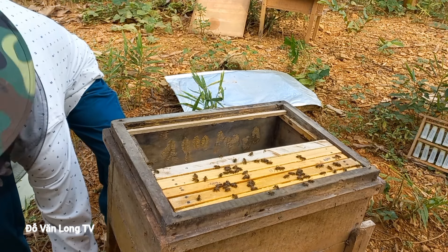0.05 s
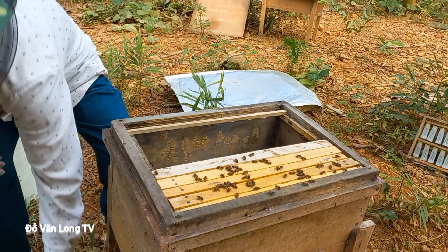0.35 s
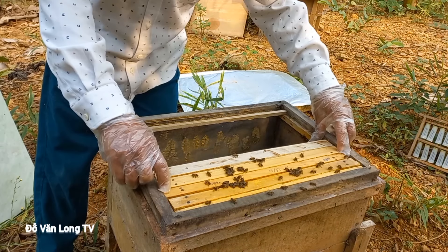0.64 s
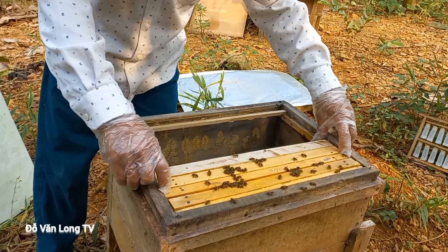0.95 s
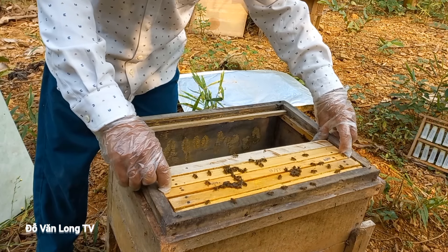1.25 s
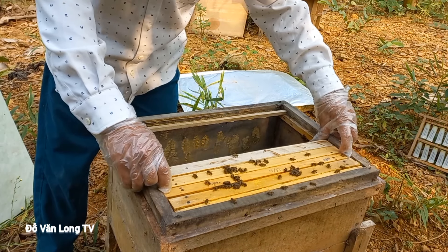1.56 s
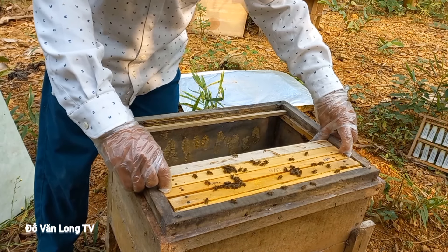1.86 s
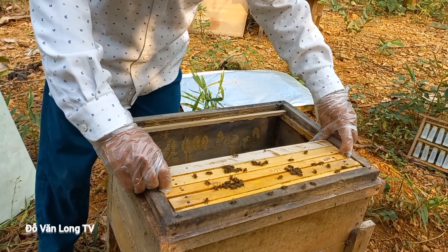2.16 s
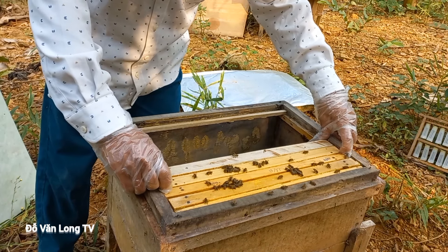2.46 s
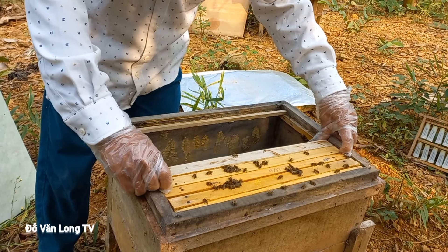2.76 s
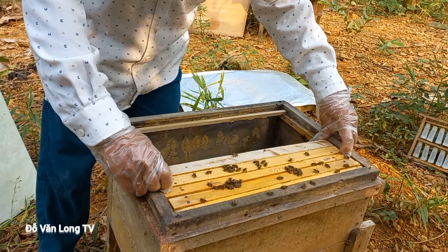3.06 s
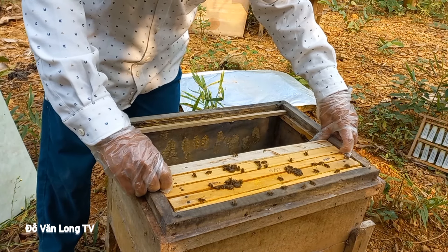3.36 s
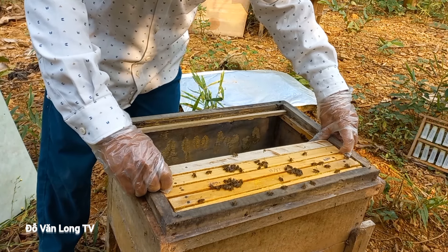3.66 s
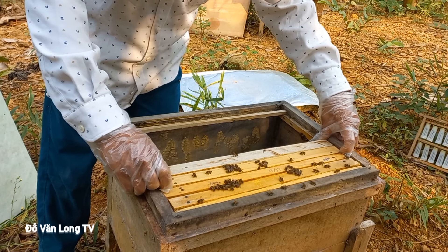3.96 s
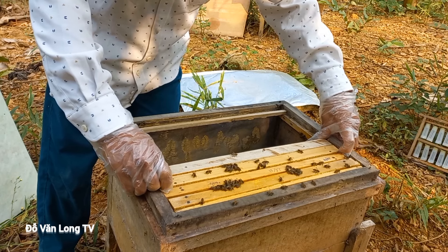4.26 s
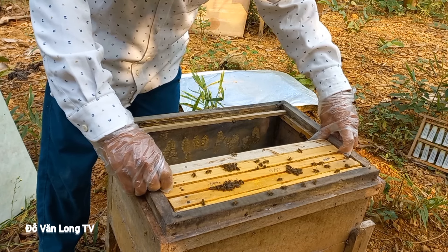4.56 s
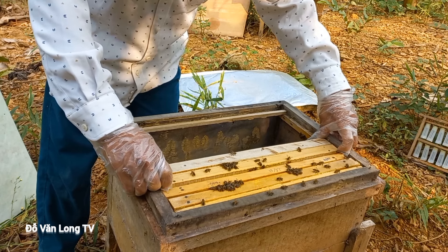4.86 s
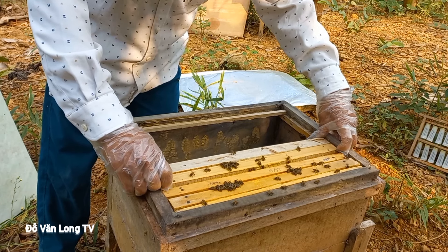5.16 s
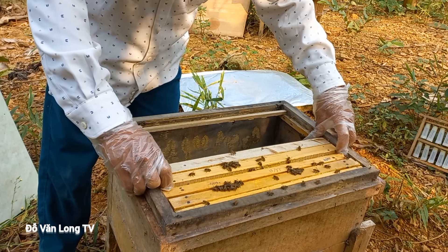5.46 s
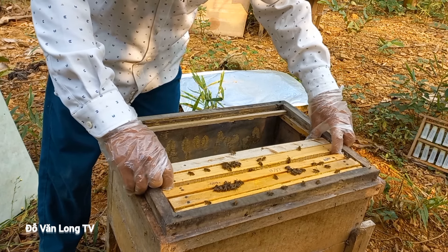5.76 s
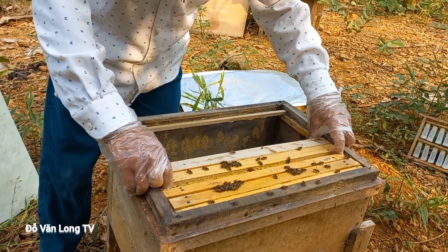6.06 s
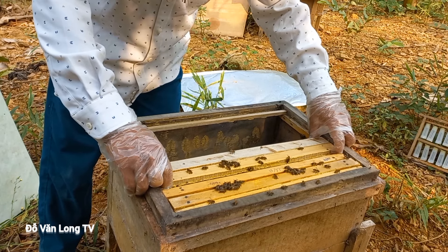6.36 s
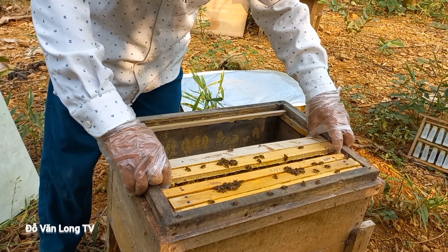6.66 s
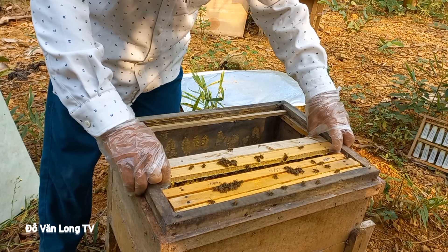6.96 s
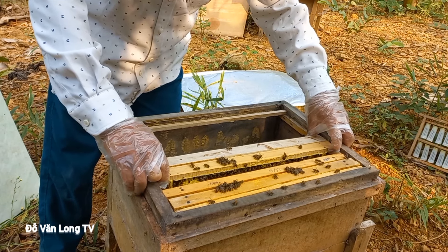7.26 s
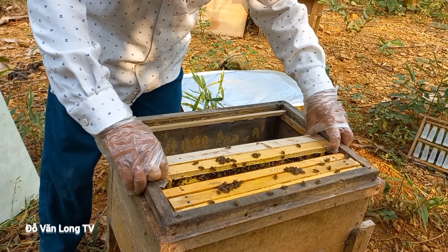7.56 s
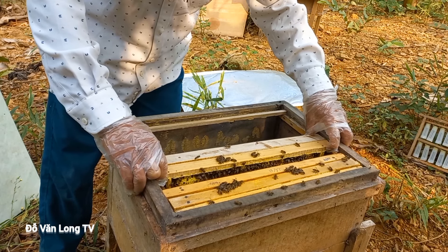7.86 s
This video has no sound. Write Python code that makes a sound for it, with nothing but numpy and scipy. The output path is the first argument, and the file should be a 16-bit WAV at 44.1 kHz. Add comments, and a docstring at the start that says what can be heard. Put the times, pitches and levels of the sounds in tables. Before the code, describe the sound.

Birds chirp and plastic gloves rustle and snap at an open beehive, with a far engine thudding and slowly fading.

```python
"""Lifting a frame from a beehive

A beekeeper eases a frame out of an open wooden hive in a garden. Creases buckle in thin plastic gloves,
the frames tick and scrape, and the box rings once at the outset. Small birds chirp in the trees and the
colony's wingbeats make a faint buzz. From half a second on, a train of low thuds, like a far
single-cylinder engine, throbs under it all and slowly runs down."""
import sys
import numpy as np
from scipy import signal
from scipy.fft import rfft, irfft, next_fast_len
from scipy.io import wavfile
from scipy.ndimage import uniform_filter1d

SR = 44100
rng = np.random.default_rng(int(sys.argv[2]) if len(sys.argv) > 2 else 0)


def log_audio(samples):
    """Write samples as a 16-bit WAV file to the path given in sys.argv[1]."""
    # one column per channel
    frames = np.atleast_2d(samples).T
    # limit to full scale, then quantise
    limited = np.clip(frames, -1, 1)
    pcm = np.round(limited * 32767).astype(np.int16)
    wavfile.write(sys.argv[1], SR, pcm)


N = 358091
T = np.arange(N) / SR

# Crinkle as the hands reach, grip and pull. Each row: time in seconds, relative level in dB.
HAND_EFFORT = [(0.0, -56), (0.48, -63.5), (0.6, -55.5), (1.08, -56), (1.36, -45.5), (1.62, -53),
               (2.42, -60), (3.66, -62), (3.98, -58), (4.45, -62.5), (4.85, -61), (5.1, -70.5),
               (5.24, -58.5), (5.36, -51.5), (5.72, -50), (5.88, -44.5), (6.2, -70.5), (6.6, -58),
               (6.75, -65), (7.53, -64.5), (7.9, -66), (8.05, -68.5)]
# Quick shifts of the fingers. Each row: start in seconds, length in seconds, relative level in dB.
FINGER_RUSTLES = [(0.033, 0.13, -60), (0.248, 0.19, -57.5), (1.538, 0.2, -48.5), (1.983, 0.42, -62),
                  (2.803, 0.052, -70), (2.922, 0.1, -52.5), (3.73, 0.19, -54), (4.135, 0.1, -47.5),
                  (4.753, 0.12, -53.5), (5.77, 0.25, -50.5), (6.109, 0.13, -52.5), (6.314, 0.073, -57),
                  (6.484, 0.15, -58)]
# Spectrum of the glove crinkle as coloured by the microphone. Each row: frequency in Hz, gain in dB.
CRINKLE_SPECTRUM = [(300, -36), (900, -19), (1550, -7.5), (2500, -13), (4000, -6.5), (5700, -7),
                    (6900, 0.5), (8300, -7), (10000, -2), (12000, 2.5), (13600, 5), (16000, -5)]
# Snaps of film and frame. Each row: start in seconds, relative peak in dB, left minus right in dB.
SNAP_EVENTS = [(0.0344, -31, 5), (0.541, -48, -2), (0.6689, -32.5, -1), (0.812, -30.5, 11),
               (1.0899, -33, 3), (1.8464, -30.5, 5), (1.9002, -24.5, 1), (1.9505, -26, -4),
               (2.0862, -34, 1), (2.1425, -36, -5), (2.2313, -32, -2.5), (2.6122, -37.5, -1.5),
               (2.9492, -26.5, 0), (3.0255, -36, 1), (3.1692, -40, -4), (3.273, -31.5, 7), (3.3824, -34, 2),
               (3.715, -34.5, 0), (3.7638, -33, -1), (3.843, -32.5, 2), (3.912, -28, 6), (4.1596, -29, -2),
               (4.2078, -28, -1), (4.3021, -34.5, 4), (5.3907, -26, 0), (5.724, -32, 3),
               (5.8277, -29.5, -0.5), (5.8638, -24, 4), (5.8835, -23.5, 2), (6.0327, -25, 4),
               (6.0536, -33, 2), (6.1544, -30, 3), (6.1774, -33, -0.5), (6.2118, -35.5, 1),
               (6.353, -37.5, 0), (6.4715, -34, 12), (6.8313, -37, -6), (7.1392, -35, 3), (7.1838, -37, 15),
               (7.2594, -32, -1), (7.3607, -37.5, 4), (7.6495, -39, 1.5), (7.666, -38, 1),
               (7.7476, -33, -2), (7.7643, -35.5, 3), (7.8608, -39, 0)]
# Spectrum of a snap. Each row: frequency in Hz, gain in dB.
SNAP_SPECTRUM = [(500, -35), (2500, -44), (5000, -14.5), (7000, 1.5), (9000, -9), (13000, 1.5),
                 (16000, -10)]
# Modes of the hive box. Each row: frequency in Hz, level in dB, time to fall 60 dB in seconds.
BOX_MODES = [(168.7, -61, 0.68), (320, -50, .17), (353, -41, 0.13), (406, -48, 0.1), (533, -51, 0.16),
             (670, -44.5, 0.04)]
# Spectrum of the box's loose parts. Each row: frequency in Hz, gain in dB.
RATTLE_SPECTRUM = [(60, -12), (330, 2), (800, -9), (1400, -17), (2200, -20), (6000, -23)]
# Bird notes that dip, then whip upward. Each row: start in seconds, length in seconds,
# first pitch in Hz, rise in octaves, dip in octaves, relative level in dB.
BIRD_WHITS = [(0.065, 0.076, 2840, 0.48, .08, -63), (0.28, 0.073, 2920, 0.42, 0.039, -64.5),
              (0.44, 0.057, 2970, 0.43, 0.071, -65), (0.868, 0.04, 2990, .25, .08, -59),
              (1.443, 0.031, 2870, 0.32, 0.032, -59), (1.603, 0.038, 3070, 0.26, 0.016, -59),
              (1.648, 0.044, 2550, .28, 0.12, -55.5), (1.835, 0.055, 3030, 0.32, 0.18, -51.5),
              (1.913, 0.056, 2750, 0.19, 0.052, -55), (1.993, 0.045, 3034, 0.58, 0.18, -53),
              (2.088, 0.046, 2635, 0.29, 0.035, -53), (2.129, 0.041, 3300, 0.31, 0.19, -48),
              (2.17, 0.047, 2900, 0.35, 0.12, -52), (2.255, 0.054, 2980, 0.17, .15, -56.5),
              (2.334, 0.07, 2530, 0.47, 0.11, -56.5), (2.617, 0.058, 2286, 0.71, 0.027, -55),
              (2.666, 0.039, 3160, 0.36, 0.21, -51), (2.86, 0.078, 2483, 0.47, 0, -55),
              (2.917, 0.04, 3010, 0.47, 0.074, -53.5), (3.048, 0.073, 2310, 0.34, 0.02, -55),
              (3.295, 0.054, 2260, 0.52, 0.013, -57), (3.448, 0.045, 3070, 0.51, 0.074, -56),
              (3.887, 0.044, 2914, 0.67, .15, -56.5), (4.313, 0.048, 2700, .28, 0.13, -53.5),
              (4.447, 0.057, 2560, 0.35, 0.14, -56), (4.532, 0.037, 3097, 0.31, 0.07, -52.5),
              (4.65, 0.056, 3058, 0.39, 0.092, -53), (5.276, 0.077, 2960, 0.5, .17, -59.5),
              (5.424, 0.065, 2970, 0.45, 0.081, -58.5), (5.848, 0.04, 2300, 0.3, 0.091, -58),
              (5.914, 0.041, 2940, 0.49, 0.1, -54), (6.826, 0.088, 2260, 0.62, .02, -70.5),
              (7.703, 0.034, 2660, .48, 0.097, -69)]
# Bird notes that glide up or down. Each row: start in seconds, length in seconds,
# first pitch in Hz, glide in octaves, relative level in dB.
BIRD_SLURS = [(0.0, 0.038, 2790, 0.17, -63), (0.83, 0.052, 2306, 0.14, -57.5),
              (1.01, 0.033, 2820, .12, -63), (1.105, 0.029, 3220, 0.034, -54),
              (1.154, 0.046, 2840, 0.1, -60), (1.239, 0.11, 6700, -0.087, -48.5),
              (1.27, 0.032, 2500, 0.17, -52.5), (1.31, 0.026, 2530, -0.23, -57),
              (1.332, 0.075, 6520, 0.18, -52), (1.46, 0.075, 3750, -0.14, -58),
              (1.572, .06, 2404, 0.14, -54.5), (1.63, .075, 2640, -.17, -59),
              (2.266, 0.071, 3650, -0.35, -51), (2.44, 0.033, 3370, -0.3, -57),
              (2.462, 0.036, 2226, 0.34, -60.5), (2.685, 0.07, 3040, 0.01, -53),
              (2.979, 0.045, 2053, 0.25, -57), (3.119, 0.085, 3614, -0.38, -53),
              (3.238, 0.042, 2660, -0.11, -57.5), (3.355, 0.032, 3250, -0.1, -55.5),
              (3.963, 0.095, 2870, 0.04, -64.5), (4.067, .075, 2490, 0.36, -63),
              (4.235, 0.068, 2353, 0.3, -54.5), (4.291, 0.036, 2850, -0.13, -52.5),
              (4.362, 0.026, 3170, 0.008, -55), (4.425, 0.03, 2360, 0.1, -55),
              (4.497, 0.0446, 3190, -0.13, -50), (4.565, 0.025, 3860, 0.025, -51),
              (4.605, .055, 3830, -0.011, -57.5), (4.738, 0.045, 2974, -0.072, -56),
              (4.8, 0.068, 2620, -0.22, -60.5), (5.529, 0.09, 2254, 0.27, -60.5),
              (5.761, 0.11, 2383, 0.085, -57), (6.072, 0.071, 3360, -0.69, -62.5),
              (6.315, 0.11, 2313, 0.29, -56), (6.496, 0.039, 2250, 0.52, -55),
              (6.524, 0.025, 3280, .03, -46), (6.55, 0.034, 3270, -0.38, -51),
              (6.997, 0.059, 2325, 0.43, -67.5), (7.034, 0.091, 2886, -0.21, -64.5)]
# Engine speed. Each row: time in seconds, firings per second.
FIRING_RATE = [(0.53, 26.925), (1.3, 26.172), (2.2, 25.173), (3.0, 24.546), (3.7, 24.385), (4.4, 24.599),
               (5.2, 24.465), (6.1, 24.409), (6.8, 23.67), (7.5, 22.357), (8.12, 20.989)]
# Spectrum of one exhaust thud. Each row: frequency in Hz, gain in dB.
PIPE_SPECTRUM = [(20, -60), (48, -18.5), (72, -14.5), (98, 0), (120, 6), (150, 0), (175, -2), (200, -7.5),
                 (232, -19.5), (275, -13.5), (320, -21.5), (385, -31.5), (440, -46.5), (650, -70),
                 (1500, -71.5)]
# Spectrum of a puff of gas. Each row: frequency in Hz, gain in dB.
PUFF_SPECTRUM = [(100, -16), (190, -5), (270, 2), (370, -4), (480, -22.5), (1000, -47)]
# The thud's low part, set by engine load. Each row: time in seconds, relative level in dB.
THUD_LEVEL = [(0.63, -36), (0.95, -37), (1.34, -35.3), (1.9, -41.5), (2.5, -41.5), (2.72, -40), (4.0, -42),
              (5.2, -43.5), (5.9, -44.5), (6.1, -48.5), (6.4, -51), (7.33, -51), (7.85, -56.5), (8.1, -60)]
# The thud's upper part, its bark. Each row: time in seconds, relative level in dB.
BARK_LEVEL = [(0.58, -52.5), (1.81, -50.5), (2.82, -54), (3.52, -50.5), (4.24, -53.5), (5.75, -52.5),
              (6.55, -63.5), (7.9, -72), (8.1, -94)]
# Dulling as the throttle closes. Each row: time in seconds, low-passed share of the thud from 0 to 1.
THUD_DULLING = [(6.0, 0), (6.75, 0.67)]
# Spectrum of the resonant wash. Each row: frequency in Hz, gain in dB.
WASH_SPECTRUM = [(25, -10.5), (150, 15.5), (330, 3.5), (600, -2), (950, -2), (1450, 0.5), (1800, -2),
                 (2200, -3), (3000, -6), (4500, -8.5), (9000, -40.5)]
# Midrange resonances in the wash. Each row: frequency in Hz, bandwidth in Hz, mean gain in dB.
WASH_RESONANCES = [(524, 23, -2), (910, 105, -3), (1040, 50, -4), (1130, 62, -5.5), (1334, 31, -0.5),
                   (1656, 54, 3), (1944, 52, -8.5)]
# The wash: far engine clatter, then the frame scraping at 5.3-6.7 s.
# Each row: time in seconds, relative level in dB.
WASH_ENVELOPE = [(0.6, -51.5), (0.95, -53.5), (1.35, -52.5), (2.1, -55.5), (2.85, -64.5), (3.3, -63.5),
                 (3.72, -68), (4.15, -63), (4.45, -66.5), (4.7, -63.5), (5.15, -69), (5.42, -61),
                 (5.9, -62.5), (6.02, -67.5), (6.15, -63), (6.33, -70.5), (6.6, -65.5), (6.74, -76),
                 (8.1, -84.5)]
# The buzz grows as the gap between the frames opens. Each row: time in seconds, level in dB.
COLONY_LEVEL = [(0.0, -79.5), (6.2, -73), (6.8, -65), (8.12, -69)]
# The colony's low murmur and the garden's hiss. Each row: frequency in Hz, gain in dB.
AIR_SPECTRUM = [(30, 2), (110, 17), (260, 7.5), (500, 4), (800, -6), (1400, -6), (2100, -21), (3500, -15),
                (4800, 4.5), (7000, -6), (8800, -30), (13000, -19), (16000, 2)]
# Imbalance of the two microphone ports. Each row: frequency in Hz, left minus right in dB.
PORT_BALANCE = [(500, 3.5), (2500, 3), (4500, 1.5), (6800, 10), (8500, 5), (11000, -1), (15000, -3.5)]


def gloves(crinkle_db=5.5, rustle_db=2, rub_db=-3, buckles_per_s=1600, ticks_per_s=34, ring_s=.00053):
    """Buckling: creases in the film give way in tiny bursts over the friction noise of film and sleeve."""
    power = undb(curve(HAND_EFFORT) + crinkle_db) ** 2
    for start, length, db in FINGER_RUSTLES:
        add(power, start, undb(db + rustle_db) ** 2 * signal.windows.tukey(int(length * SR), .6))
    effort_db = 10 * np.log10(power)
    buckles = rng.random(N) < buckles_per_s / SR
    sizes = undb(7 * np.minimum(rng.exponential(size=N), 3.4))
    ticks = 18 * (rng.random(N) < ticks_per_s / SR) * rng.random(N)
    ticks *= undb((effort_db.mean() - effort_db) / 2)  # they stand out while the hands are nearly still
    energy = decay(buckles * sizes ** 2 + ticks ** 2, ring_s)
    creases = unit(np.sqrt(energy) * stereo_noise())
    rub = undb(rub_db) * stereo_noise()
    crinkle = unit(ports(colour(creases + rub, CRINKLE_SPECTRUM)))
    return crinkle * undb(effort_db + 2 * walk(60))


def snaps(gain_db=8, burst_s=.00063, settle_db=-20, settle_s=.0045, ring_range_hz=(10500, 14700)):
    """Impulsive excitation: each snap of film or frame drives its own broad resonance, then settles."""
    out, t = np.zeros((2, N)), T[:SR // 25]
    envelope = np.exp(-t / burst_s) + undb(settle_db) * np.exp(-t / settle_s)
    for start, db, side_db in SNAP_EVENTS:
        burst = stereo_noise(len(t)) * envelope
        burst += resonate(burst, rng.uniform(*ring_range_hz), q=3)
        burst /= np.abs(burst).max(axis=1, keepdims=True)
        add(out, start + .001, burst * undb(db + gain_db) * pan(side_db))
    return colour(out, SNAP_SPECTRUM)


def box_knock(rattle_db=-51, rattle_t60=.28, yard_db=-63, yard_t60=1.3):
    """Damped modes: the knocked box rings, its loose parts rattle and the yard reverberates."""
    ring = sum(undb(db - 60 * T / t60) * np.sin(2 * np.pi * hz * T) for hz, db, t60 in BOX_MODES)
    rattle = unit(colour(stereo_noise(), RATTLE_SPECTRUM))
    envelope = undb(rattle_db - 60 * T / rattle_t60) + undb(yard_db - 60 * T / yard_t60)
    return ring + rattle * envelope


def birds(trees_t60=.58):
    """Modulation sidebands: a fast, uneven tremor makes the whistles hoarse; the trees scatter them."""
    wobble = walk(700)
    song = falling_note(wobble)
    for start, length, hz, rise, dip, db in BIRD_WHITS:
        progress = np.linspace(0, 1, int(length * SR))
        glide = rise * progress ** 2.016 - dip * np.sin(np.pi * progress)
        add(song, start, undb(db) * bird_note(hz, glide, wobble[T >= start], db_per_octave=5))
    for start, length, hz, octaves, db in BIRD_SLURS:
        glide = octaves * np.linspace(0, 1, int(length * SR)) ** .85
        add(song, start, undb(db) * bird_note(hz, glide, wobble[T >= start], db_per_octave=-3))
    direct = undb(-4.2) * song * undb(1.5 * walk(150)) * (1 + .35 * walk(1100))
    roughened = song * (.75 + .55 * walk(450) + .45 * walk(1300))
    echoes = undb(-.8) * scatter(roughened, trees_t60, early_db=0, early_s=.028)
    return (direct + echoes) * pan(4.7)


def bird_note(start_hz, glide, wobble, db_per_octave):
    """Frequency modulation: a whistle glides in octaves, less steady the further from its first pitch."""
    unsteadiness = (.015 + .022 * abs(glide)) * wobble[:len(glide)]
    hz = start_hz * 2 ** glide * (1 + unsteadiness)
    swell = signal.windows.tukey(len(glide), .27) * undb(db_per_octave * abs(glide))
    return unit(np.sin(phase(hz)) * swell)


def falling_note(wobble, start_s=7.368, length_s=.15, start_hz=6450, fall_octaves=1.4, gain_db=-57):
    """Exponential sweep: one long bird note swells, slides down and dies away while still falling."""
    out, t = np.zeros(N), T[:int(length_s * SR)]
    hz = start_hz * 2 ** (-fall_octaves * t / length_s) * (1 + .03 * wobble[:len(t)])
    attack = np.minimum(t / .022, 1) ** 2
    release = np.exp(-np.maximum(t - .088, 0) / .03)
    add(out, start_s, undb(gain_db) * unit(np.sin(phase(hz)) * attack * release))
    return out


def throb_and_wash(onset_s=.538, echo_db=-21):
    """Superposition: the exhaust arrives from the right with its echoes and a resonant wash."""
    rate = curve(FIRING_RATE)
    throb = exhaust(firings(rate), rate)
    wash = resonant_wash()
    echoes = undb(echo_db) * scatter(throb, t60=.54)
    return (from_right(throb) * pan(1.24) + echoes + wash) * (T > onset_s)


def firings(rate, first_s=.5573, jitter_s=.00014, uneven_db=.5):
    """A quasi-periodic pulse train: one firing a cycle, slightly uneven in time and strength."""
    cycles = np.cumsum(rate * (T > first_s)) / SR
    due = np.flatnonzero(np.diff(np.ceil(cycles)))
    timing, strength = rng.standard_normal((len(due), 2)).T
    fired = due + (jitter_s * SR * timing).astype(int)
    pulses = np.zeros(N)
    pulses[np.clip(fired, 0, N - 1)] = undb(uneven_db * strength)
    return pulses


def exhaust(pulses, rate, split_hz=225, dull_hz=178, puff_s=.025):
    """Pulsed flow: each firing gives a low thud, a higher bark and a turbulent puff of gas."""
    pipe = long_path(pipe_ring(pulses, rate))
    lows = lowpass(pipe, split_hz)
    bark = unit(pipe - lows)
    thud = unit(lows + curve(THUD_DULLING) * (lowpass(lows, dull_hz) - lows))
    gas = decay(pulses, puff_s) * rng.standard_normal(N)
    puff = unit(colour(gas, PUFF_SPECTRUM)[0])
    upper = undb(-1.9) * bark + undb(-12) * puff
    return undb(curve(THUD_LEVEL) + .25) * thud + undb(curve(BARK_LEVEL)) * upper


def pipe_ring(pulses, rate, reference_rate_hz=24.82):
    """Resonance: each firing rings the pipe, slower and lower as the engine runs down."""
    ring = colour(signal.unit_impulse(N), PIPE_SPECTRUM)[0]
    out, t = np.zeros(N), T[:SR // 6]
    for i in np.flatnonzero(pulses):
        pitch_ratio = (rate[i] / reference_rate_hz) ** .75
        add(out, T[i], pulses[i] * np.interp(t * pitch_ratio, t, ring[:len(t)], right=0))
    return out


def long_path(x, detours_s=(.006, .0105, .017)):
    """Dispersion and interference: the lows lag, and detours through moving air make the colour waver."""
    dispersed = 2 * resonate(x, hz=180, q=.74) - x  # an all-pass filter
    return dispersed + sum(.105 * walk(3.5) * delay(dispersed, lag) for lag in detours_s)


def resonant_wash(gain_db=7.5, diffuse_db=-3):
    """Noise-driven midrange resonances: far engine clatter, then the frame scraping as it is pulled."""
    direct = from_right(rng.standard_normal(N))
    wash = colour(direct + undb(diffuse_db) * stereo_noise(), WASH_SPECTRUM)
    ringing = sum(undb(db + 4.4 * walk(6)) * resonate(wash, hz, hz / width)
                  for hz, width, db in WASH_RESONANCES)
    return unit(wash + ringing) * undb(curve(WASH_ENVELOPE) + gain_db + walk(20))


def colony(bees=24, wing_hz=240, pitch_spread=.13, overtone_db=-18):
    """Incoherent addition: wingbeats, each at its own wandering rate, merge into a blurred buzz."""
    out = np.zeros((2, N))
    for detune, side in rng.standard_normal((bees, 2)):
        beat = phase(wing_hz * np.exp(pitch_spread * detune + .07 * walk(20)))
        buzz = np.sin(beat) + undb(overtone_db) * np.sin(2 * beat)
        out += buzz * undb(3 * walk(7)) * pan(2 * side)
    return unit(out) * undb(curve(COLONY_LEVEL))


def far_whistle(hz=1333, gain_db=-66):
    """Reverberant field: a faint, unsteady whistle from far off arrives as diffuse echo."""
    note = np.sin(phase(hz * (1 + .016 * walk(90))))
    swell = np.interp(T, [5.58, 5.68, 6.12, 6.2], [0, 1, 1, 0])
    return scatter(note * swell, t60=1) * undb(gain_db)


def air(db=-62):
    """Ambient noise: a soft, nearly steady murmur and hiss surround the hive."""
    return unit(ports(colour(stereo_noise(), AIR_SPECTRUM))) * undb(db + walk(2.26))


def scatter(x, t60, early_db=5, early_s=.051):
    """Diffuse reflection: quick echoes from ground and leaves, then a tail from trees and walls."""
    t = T[:SR]
    tail = stereo_noise(SR) * (undb(-60 * t / t60) + undb(early_db) * np.exp(-t / early_s))
    tail /= np.sqrt(np.sum(tail ** 2) / 2)
    return signal.fftconvolve(np.atleast_2d(x), tail, axes=1)[:, :N]


def from_right(x, lag_s=.00035):
    """Path difference: sound from the right reaches the left port later."""
    return np.array([delay(x, lag_s), x])


def ports(x):
    """Frequency response: each microphone port colours the sound in its own way."""
    size = next_fast_len(N)
    return irfft(rfft(x, size) * pan(spectrum_db(PORT_BALANCE, size)), size)[:, :N]


def colour(x, spectrum, size=16384):
    """Causality: a minimum-phase filter of the given spectrum rings after a hit, never before."""
    cepstrum = irfft(np.log(undb(spectrum_db(spectrum, size))))
    cepstrum[1:size // 2] *= 2
    cepstrum[size // 2 + 1:] = 0
    response = irfft(np.exp(rfft(cepstrum)))[:size // 2]
    return signal.fftconvolve(np.atleast_2d(x), response[None], axes=1)[:, :N]


def spectrum_db(table, size):
    """Interpolation in log frequency gives a gain in dB for each FFT bin."""
    hz, db = np.transpose(table)
    return np.interp(np.log(np.fft.rfftfreq(size, 1 / SR) + 1), np.log(hz), db)


def resonate(x, hz, q):
    """A second-order resonator passes a band hz / q wide."""
    return signal.lfilter(*signal.iirpeak(hz, q, SR), x)


def lowpass(x, hz):
    """Zero-phase filtering removes the highs without delay."""
    return signal.sosfiltfilt(signal.butter(4, hz, fs=SR, output="sos"), x)


def decay(pulses, time_constant_s):
    """Exponential decay follows each pulse."""
    return signal.lfilter([1], [1, -np.exp(-1 / (time_constant_s * SR))], pulses)


def delay(x, lag_s):
    """Travel time shifts a signal later."""
    return np.interp(T - lag_s, T, x)


def phase(hz):
    """Phase is the running integral of frequency."""
    return 2 * np.pi * np.cumsum(hz) / SR


def walk(rate_hz):
    """Smoothed random steps give a wander of rms 1."""
    hold = int(SR / rate_hz)
    steps = np.repeat(rng.standard_normal(N // hold + 1), hold)
    return unit(uniform_filter1d(uniform_filter1d(steps, hold), hold)[:N])


def stereo_noise(samples=N):
    """White noise, uncorrelated between the sides."""
    return rng.standard_normal((2, samples))


def curve(table):
    """Linear interpolation in time gives a value per sample."""
    return np.interp(T, *np.transpose(table))


def add(out, start_s, sound):
    """Superpose a sound at a given time."""
    i = max(int(start_s * SR), 0)
    out[..., i:i + sound.shape[-1]] += sound[..., :N - i]


def pan(db):
    """A level difference sets the left and right gains."""
    return undb(np.array([[.5], [-.5]]) * db)


def undb(db):
    """Decibels to amplitude ratio."""
    return 10 ** (np.asarray(db) / 20)


def unit(x):
    """Normalise to rms 1."""
    return x / np.sqrt(np.mean(x ** 2))


def scene():
    """Superposition: the pressures of all sources add."""
    return gloves() + snaps() + box_knock() + birds() + throb_and_wash() + colony() + far_whistle() + air()


def record(dry, top_hz=16000):
    """Band limiting: a steep low-pass cuts the highest treble."""
    return signal.sosfilt(signal.ellip(10, .2, 70, top_hz, fs=SR, output="sos"), dry)


dry = scene()
out = record(dry)
log_audio(out)
```